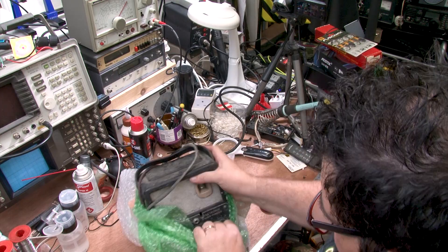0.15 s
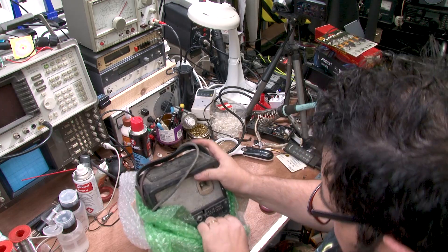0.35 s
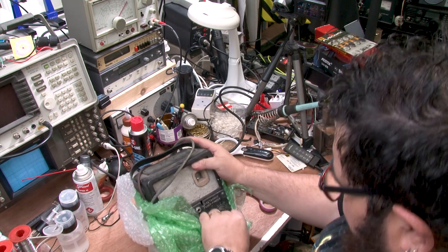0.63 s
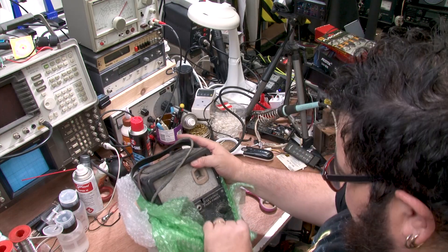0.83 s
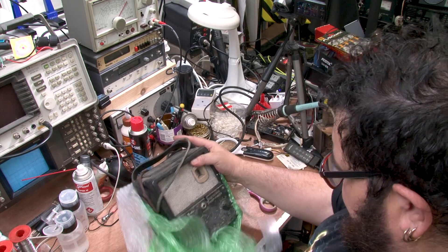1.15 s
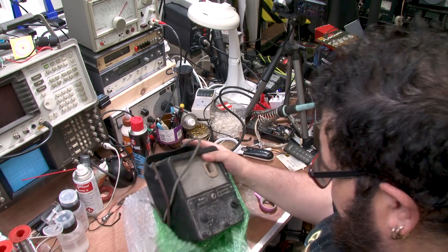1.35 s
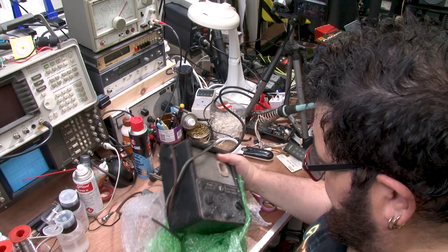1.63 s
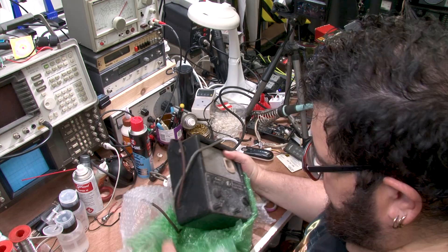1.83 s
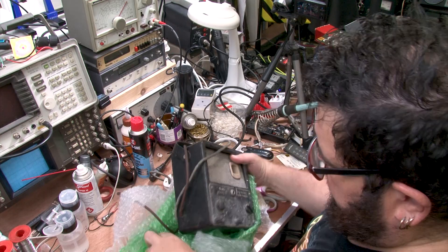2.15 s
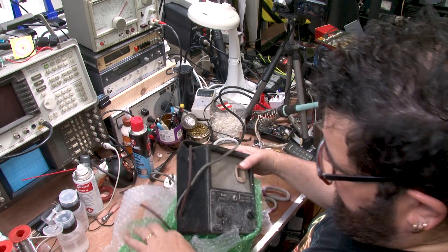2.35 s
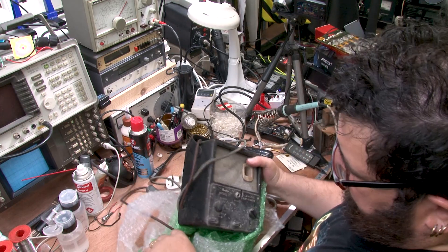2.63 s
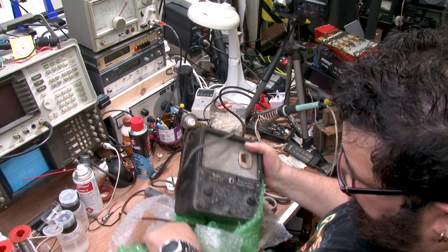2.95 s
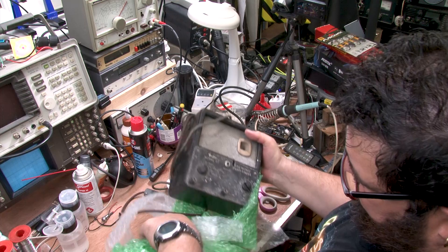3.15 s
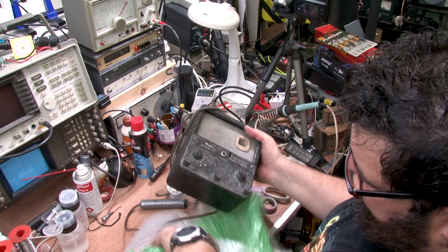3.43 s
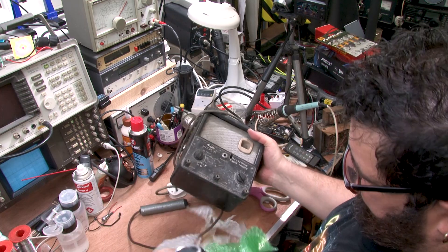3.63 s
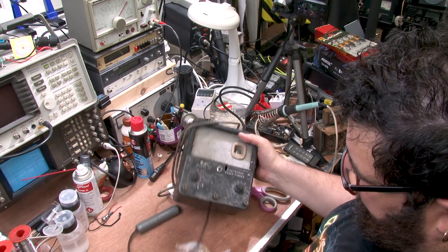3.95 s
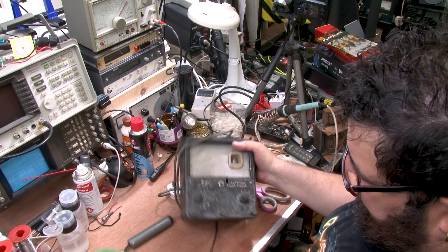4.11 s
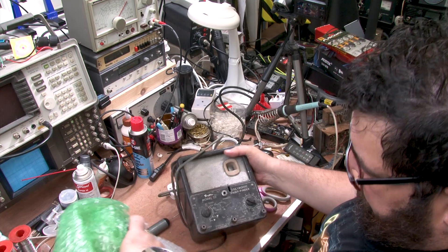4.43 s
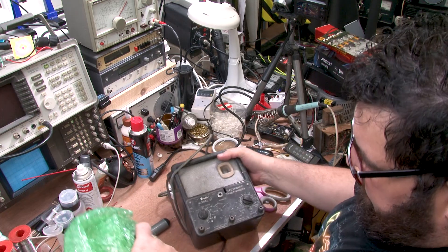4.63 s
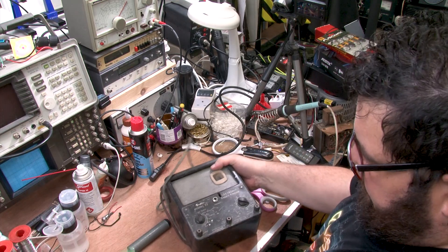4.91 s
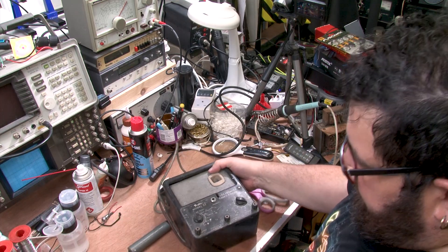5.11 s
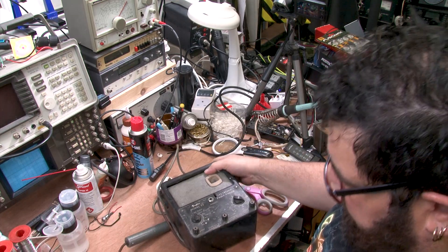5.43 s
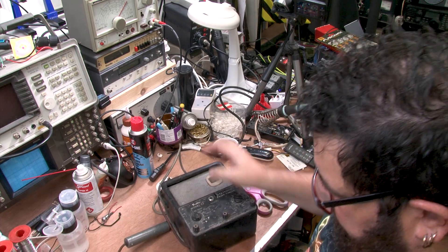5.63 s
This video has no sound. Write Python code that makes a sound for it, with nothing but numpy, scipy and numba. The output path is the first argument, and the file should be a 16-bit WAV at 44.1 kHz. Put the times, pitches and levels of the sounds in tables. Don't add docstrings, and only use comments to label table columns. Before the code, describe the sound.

Close stereo pickup of unpacking at a workbench: crisp plastic film crackles in uneven tugs, air pockets snapping loudly, while the metal box inside booms dully when bumped. A thick cluster of snaps comes early, another sharp burst midway. Faint film squeaks precede the heaviest knock on the bench; afterwards come softer bumps, a dry clink and near quiet with faint room hum.

```python
import sys
import numpy as np
from scipy import signal
from scipy.fft import rfft, irfft
from scipy.io import wavfile
from scipy.ndimage import uniform_filter1d
from numba import njit

SR = 44100
rng = np.random.default_rng(int(sys.argv[2]) if len(sys.argv) > 2 else 0)


def output_pcm(signal):
    pcm = np.clip(np.atleast_2d(signal).T, -1, 1) * 32767
    wavfile.write(sys.argv[1], SR, np.round(pcm).astype(np.int16))


def voltage_ratio(decibels):
    exponent = np.asarray(decibels, float) / 20
    return 10 ** exponent


N = 254456


def along(table, t):
    s, *columns = np.transpose(table)
    return [np.interp(t, s, c) for c in columns]


def colour_db(spectrum, hz):
    f, db = np.transpose(spectrum)
    return np.interp(np.log(np.maximum(hz, 1)), np.log(f), db)


def unit(x):
    return x / np.sqrt(np.mean(x ** 2))


def above(x, hz):
    return signal.sosfilt(signal.butter(2, hz, "high", fs=SR, output="sos"), x)


def swells(t, start, hold, db, rise, fall):
    since = t[:, None] - start
    return voltage_ratio(2 * (db + rise * np.minimum(since, 0) - fall * np.maximum(since - hold, 0)))


@njit
def ring(n, start, turn, fade, size):
    out = np.zeros(n)
    for k in range(len(start)):
        i = int(start[k]) + 1
        p = np.exp(1j * turn[k] - fade[k])
        z = size[k] * p ** (i - start[k])
        for j in range(max(i, 0), min(n, i + int(7 / fade[k]))):
            out[j] += z.imag
            z *= p
    return out


def swings(s, hz, t60, db, pan_db, lag):
    turn = 2 * np.pi * np.minimum(hz, .38 * SR) / SR
    fade = np.log(1000) / (np.maximum(t60, 1e-4) * SR)
    size = voltage_ratio(db) * (-1.) ** np.arange(len(s))
    return np.array([ring(N, s * SR + side * lag / 2, turn, fade, size * voltage_ratio(side * pan_db / 2))
                     for side in (1., -1.)])


def body(x, modes, stretch=1):
    t = np.arange(SR // 5) / SR
    response = 0
    for k, (hz, db, t60) in enumerate(modes):
        decay = 1000. ** (-t / (t60 * stretch))
        response = response + (-1) ** k * voltage_ratio(db) * np.sin(2 * np.pi * hz * t) * decay
    return signal.fftconvolve(x, response)[:len(t) if len(x) < SR else N]


def chatter(table, spread):
    out = 0
    for s, length, hz, db, ring_s in table:
        when, size, tune = rng.random((30, 3)).T
        taps = swings(s + length * when ** 1.2, hz * (1 + spread * (tune - .5)), ring_s + 0 * when,
                      -8 * size, -2.5 + 0 * when, 1.5 + 0 * when)
        out = out + voltage_ratio(db) * taps / np.std(taps[:, int(s * SR):int((s + length) * SR)])
    return out


# [f/Hz, density/dB]
SHOP_SPECTRUM = [(33, -15), (52, -1), (153, -5.5), (189, -17), (437, -13), (1040, -19.5), (6380, -18),
                 (13700, -30), (16000, -44)]
SHOP_DB = -46.5


def shop():
    hz = np.fft.rfftfreq(N, 1 / SR)
    mid, side = rfft(rng.standard_normal((2, N))) * voltage_ratio(colour_db(SHOP_SPECTRUM, hz))
    side = side * np.minimum(hz / 250, 1)
    return unit(irfft(np.array([mid + side, mid - side]), N)) * voltage_ratio(SHOP_DB)


# [f/Hz, density/dB]
FILM_SPECTRUM = [(290, -48), (500, 8), (933, -7.5), (1140, 2.5), (2540, 1.5), (3060, 0), (3650, 3),
                 (6330, 3), (12500, -2), (15100, -10), (16000, -24)]
# [t/s, resting rustle/dB, left minus right/dB, large folds/dB]
HAND = [(0.0, -34.5, -3.5, -5.5), (0.25, -31.5, -4, -10), (0.65, -31, -1.5, -7.5), (0.9, -26.5, -1, -12.5),
        (1.4, -26, -0.5, -7), (1.7, -25.5, -1.5, -7.5), (2.05, -28.5, -2.5, -6), (2.38, -28.5, -2, -6.5),
        (2.75, -30.5, -2, -2), (3.07, -32, -2.5, -10.5), (3.4, -29, -1.5, -10.5), (3.7, -32.5, -2, -8.5),
        (4.02, -29, -3.5, -13), (4.35, -37.5, -4, -5.5), (4.68, -46.5, -7, -2), (5.15, -38.5, -2, -8),
        (5.6, -54, -5.5, -5), (5.77, -55, -3, -10)]
# [start/s, hold/s, level/dB, fine creases/dB]
TUGS = [(0.0, .02, -25.5, -17.5), (0.132, 0.078, -26.5, -12.5), (0.34, 0.22, -27.5, -16.5),
        (0.753, 0.095, -21, -11), (0.845, .03, -26.5, -13), (0.999, 0.043, -21, -4), (1.045, .01, -23, -15),
        (1.215, 0.034, -23, -31), (1.326, .04, -30, -16), (1.12, 0.1, -20.5, -3), (1.25, 0.041, -24, -23),
        (1.377, 0.022, -21.5, -19), (1.55, 0.091, -23, -16), (1.804, 0.09, -27.5, -13),
        (2.163, 0.031, -27.5, -15), (2.373, 0.13, -27, -11), (2.565, 0.22, -28.5, -20.5),
        (2.943, 0.0048, -25, -0.5), (3.0, 0.016, -44, -25), (3.145, 0.21, -27.5, -11.5),
        (3.37, 0.014, -19.5, -11), (3.527, 0.052, -23.5, -12), (3.898, 0.054, -32, -4),
        (4.136, 0.021, -29.5, -9.5), (4.433, .03, -35.5, -12), (4.5, 0.013, -33.5, -14),
        (4.746, 0.0089, -47.5, -4), (4.868, 0.037, -37.5, -10), (4.972, 0.045, -29, -8),
        (5.061, 0.15, -28, -15), (5.306, 0.014, -31, -12), (5.43, 0.018, -40.5, -4),
        (5.739, 0.091, -30.5, -13)]
TUG_RISE_DB_S, TUG_FALL_DB_S, REST_FINE_DB = 276, 159, -13
AFTER_DB, AFTER_FALL_DB_S = -14, 350
CREASES_PER_S = 4000


def crinkle():
    count = int(CREASES_PER_S * N / SR)
    when, strength, place = rng.random((count, 3)).T
    patch, cycles, late = rng.random((count, 4, 3)).T
    s = when * N / SR
    rest_db, pan_db, fold_db = along(HAND, s)
    start, hold, tug_db, tug_fine_db = np.transpose(TUGS)
    tugs = swells(s, start, hold, tug_db, TUG_RISE_DB_S, TUG_FALL_DB_S)
    buckle_s, buckle_db = np.transpose([row[:2] for row in SNAPS + TICKS])
    after = swells(s, buckle_s + .002, 0, buckle_db + AFTER_DB, 1e5, AFTER_FALL_DB_S)
    rest = voltage_ratio(2 * rest_db) + after.sum(axis=1)
    power = rest + tugs.sum(axis=1)
    level_db = 10 * np.log10(power)
    fine_db = (rest * REST_FINE_DB + tugs @ tug_fine_db) / power
    hz = 450 * (16000 / 450) ** patch
    tilt_db = np.where(hz < 2500, fold_db + 8.5, np.where(hz > 8000, fine_db + 8.0, 0))
    db = level_db + tilt_db + colour_db(FILM_SPECTRUM, hz) + 20 * np.log10(hz / 4000)
    db = db - 1.5 * np.log(strength + 0.17) - 4.0
    t60 = (4.5 + 5 * cycles) / hz
    lag = 18 + 60 * (place - .5)
    return swings((s + 0.001143 * late).ravel(), hz.ravel(), t60.ravel(), db.ravel(),
                  np.tile(pan_db + 5 * (place - .5), 4), np.tile(lag, 4))


# [start/s, hold/s, case/dB, bench/dB]
SHOVES = [(0.0, 0.01, -40, -29), (0.14, 0.017, -36.5, -52), (0.53, 0.052, -39.5, -48),
          (1.116, 0.045, -42, -31.5), (1.277, 0.054, -33.5, -24), (1.456, 0.2, -36, -35),
          (1.854, 0.046, -48, -29), (2.15, 0.16, -38.5, -56), (2.605, 0.16, -38.5, -29),
          (2.955, 0.032, -42, -34), (3.21, 0.13, -42, -40), (3.42, .03, -33.5, -26),
          (3.502, 0.034, -34, -23), (3.805, 0.054, -45, -50), (3.96, 0.018, -41, -19.5),
          (4.14, 0.032, -37, -44), (4.397, 0.017, -39, -18), (4.73, 0.11, -51, -60),
          (5.03, 0.068, -38, -31), (5.192, 0.14, -42.5, -23)]
SHOVE_RISE_DB_S, SHOVE_FALL_DB_S = 68, 82
# [f/Hz, level/dB, ring/s]
CASE = [(151, -12.5, 0.12), (214, 0, 0.049), (245, 3, 0.049), (300, 6.5, 0.03), (339, 1, 0.083),
        (385, -3.5, 0.13), (450, 10, 0.019), (463, 4.5, 0.022), (618, -0.5, 0.052), (692, -11.5, 0.15),
        (774, -6, 0.16), (840, -7.5, 0.024), (1140, -12, 0.12)]
# [f/Hz, level/dB, ring/s]
BENCH = [(85.8, -2, 0.33), (118, 0.5, 0.072), (57, 3.5, 0.28), (150, -7, 0.1)]
# [f/Hz, level/dB, ring/s]
CUSHION = [(160, -4.5, 0.11), (207, -3.5, 0.055), (270, 2, 0.045), (320, 3.5, 0.043)]


def drag():
    t, coarse = np.arange(N) / SR, np.arange(0, N / SR, .002)
    start, hold, *levels = np.transpose(SHOVES)
    gains = []
    for db in levels:
        power = swells(coarse, start, hold, db, SHOVE_RISE_DB_S, SHOVE_FALL_DB_S).sum(axis=1)
        gains.append(np.interp(t, coarse, np.sqrt(power)))
    case_gain, bench_gain = gains
    slips = (rng.random(N) < .03) * rng.standard_normal(N) * rng.exponential(1, N)
    case = unit(above(body(slips, CASE, 0.72), 124)) * case_gain * voltage_ratio(0.5)
    case = case + unit(body(slips[::-1], CUSHION)) * case_gain * voltage_ratio(-8.0)
    bench = unit(body(rng.standard_normal(N), BENCH, 0.35)) * bench_gain * voltage_ratio(-19.5)
    return np.array([voltage_ratio(-5.5) * np.roll(case, 20), voltage_ratio(1.0) * case]), bench


# [t/s, peak/dB, f/Hz, flap/dB, flap f/Hz]
SNAPS = [(0.2085, -21.5, 6510, -22, 2040), (0.3605, -28, 3930, -4, 720), (0.412, -17, 4150, -25, 1930),
         (0.7176, -12.5, 3180, -12, 2000), (0.7551, -23, 6260, -7, 899), (0.893, -7.5, 6800, -10, 1340),
         (0.97, -13, 3500, -21, 1780), (0.984, -6, 4630, -18, 1200), (1.0059, -4.5, 6200, -16, 1050),
         (1.0902, -17, 4440, -8, 1670), (1.114, -11, 5120, -17, 1520), (1.1532, -14.5, 4470, -11, 1090),
         (1.2124, -13.5, 5400, -13.5, 1540), (1.3018, -6.5, 2980, -13, 1770),
         (1.424, -15.5, 3240, -9.5, 1720), (1.715, -22.5, 2670, -7, 1820),
         (2.4131, -16.5, 4020, -9.5, 1940), (2.7392, -31, 3270, -2, 1330), (3.48, -3, 3000, -15.5, 890),
         (4.0894, -27, 7000, -8, 1890), (4.2099, -21.5, 1970, -9, 1300), (4.514, -31, 3220, 2, 1830),
         (4.5495, -25.5, 3930, -6.5, 2110), (5.069, -24.5, 2760, -7, 1140)]
# [t/s, peak/dB, f/Hz, left minus right/dB]
TICKS = [(0.5205, -20, 4230, -10), (0.7997, -18, 3360, 4), (0.83, -20, 3200, -2), (0.876, -14, 6340, -10),
         (0.9034, -24, 6240, -4), (0.912, -11, 7030, 4), (0.9265, -8, 4670, -3), (0.9417, -10.5, 4030, 1),
         (0.9603, -7.5, 4760, -2), (0.975, -3.5, 4550, 2), (1.124, -30, 2960, 2), (1.1813, -7.5, 6660, -2),
         (1.437, -13.5, 3170, 1), (1.5448, -14, 4870, -4), (1.587, -16, 6240, 0), (1.8153, -18, 2950, -2),
         (2.173, -26, 4290, 7), (2.4749, -14, 6380, -7), (2.876, -15, 5830, -1), (2.9436, -15, 4680, 0),
         (2.9476, -13, 5000, -12), (3.016, -16.5, 6600, -4), (3.1365, -24, 2750, -1),
         (3.3558, -19, 6700, -4), (3.4797, -7, 10500, -4), (3.4823, -7, 6300, -3), (3.528, -12, 6500, 3),
         (3.5308, -12, 6500, 4), (3.5352, -17, 6400, 0), (3.568, -13.5, 3960, -1), (4.154, -17, 7000, 3),
         (4.4365, -28, 5100, -13), (4.619, -25, 11000, -8), (5.155, -29, 6050, -9)]
# [t/s, peak/dB, f/Hz, left minus right/dB]
FLICKS = [(0.0126, -25, 5170, -8), (0.0701, -29, 4820, -8), (0.3533, -36, 3880, -5), (0.596, -24, 5000, -5),
          (0.6083, -22, 5000, -6), (0.6887, -26, 4570, 3), (0.738, -13.5, 5230, 6),
          (0.8208, -8.5, 6370, -3), (0.8372, -10, 6200, 4), (1.101, -9, 6980, -1), (1.1567, -8, 7320, 2),
          (1.5748, -15.5, 4300, 4), (2.06, -21, 6460, -5), (4.166, -21.5, 5680, -10),
          (4.2003, -20, 6890, -2), (4.302, -23, 6800, -4), (4.5072, -25, 9910, -7), (4.624, -32, 12490, -7),
          (4.84, -32, 4740, -6), (5.5479, -39, 4310, 4), (5.5949, -40, 9800, -16)]
TICK_FLAP_DB, TICK_FLAP_SHARE = -55, 0.15


def snaps():
    rows = [tuple(row) + tuple(along(HAND, row[0])[1:2]) for row in SNAPS]
    rows += [(s, db, hz, TICK_FLAP_DB, hz * TICK_FLAP_SHARE, pan) for s, db, hz, pan in TICKS + FLICKS]
    s, peak_db, hz, low_db, low_hz, pan_db = np.transpose(rows)
    patch, late = rng.random((len(s), 24, 2)).T
    patch = (np.arange(24)[:, None] + patch) / 24
    s = s + 0.00071
    spray_hz = 1500 * 10 ** patch
    spray_db = peak_db + colour_db(FILM_SPECTRUM, spray_hz) + 19 * np.log10(spray_hz / 4000) - 8.0
    spray = swings((s + 0.00105 * late ** 1.366).ravel(), spray_hz.ravel(), 6 / spray_hz.ravel(),
                   spray_db.ravel(), np.tile(pan_db, 24), 12 + 22 * (late.ravel() - .5))
    lag = 5 + 0 * s
    own = swings(s + 0.000473, hz, 16 / hz, peak_db + 1.5, pan_db, lag / 3)
    flap = sum(swings(s + 0.00074, low_hz * ratio, 5 / low_hz, peak_db + low_db + db, pan_db, lag)
               for ratio, db in ((0.94, 17.5), (1.65, -31), (1.99, -35)))
    return spray + own + flap


# [t/s, peak/dB, f/Hz]
THUMPS = [(0.11, -26, 200), (0.161, -29, 240), (0.356, -18, 204), (0.557, -27, 269), (0.713, -21, 269),
          (0.744, -23, 269), (0.887, -24, 203), (1.092, -28, 157), (1.147, -24, 270), (1.293, -43, 269),
          (1.667, -38, 151), (2.198, -36, 172), (2.262, -40, 264), (2.76, -31, 272), (3.216, -33, 151),
          (3.341, -30, 237), (3.478, -34, 140), (3.615, -24, 245), (3.742, -34, 234), (3.82, -34, 153),
          (3.952, -27.5, 161), (4.149, -23, 151), (4.21, -16, 137), (4.248, -15.5, 146), (4.385, -28, 134),
          (5.064, -32, 269), (5.182, -30, 201), (5.297, -42, 121), (5.526, -38, 151)]
THUMP_CYCLES, THUMP_DB = 18, 0.5


def thumps():
    s, db, hz = np.transpose(THUMPS)
    blows = swings(s + 0.0047, hz, THUMP_CYCLES / hz, db + THUMP_DB, -2.5 + 0 * s, 6 + 0 * s)
    return above(above(uniform_filter1d(blows, size=40, axis=1), 123), 123)


# [t/s, case peak/dB, bench peak/dB, struck panel f/Hz]
BUMPS = [(0.162, -22, -42, 330), (0.359, -8, -44, 328.6), (0.512, -25, -51, 296), (0.562, -19.5, -47, 280),
         (0.715, -11.5, -44, 367), (0.745, -12.5, -50, 347), (0.89, -17, -51, 360),
         (1.003, -25.5, -53, 463), (1.153, -16.5, -54, 356), (1.416, -29, -53, 350),
         (2.765, -11.5, -56, 332), (2.881, -20, -57, 450), (2.946, -27, -53, 400), (3.368, -21.5, -28, 450),
         (3.48, -40, -19, 385), (3.615, -23, -33.5, 385), (4.145, -23, -42, 260), (4.21, -1.5, -9, 451),
         (4.254, -49, -14, 350), (4.287, -23, -25, 415), (4.575, -27.5, -67, 395), (4.738, -23.5, -57, 380),
         (5.186, -25, -31, 385), (5.301, -19, -17, 356), (5.39, -32, -29, 339), (4.369, -40, -55, 367),
         (4.618, -34, -60, 385), (4.696, -33, -60, 428), (4.858, -34, -60, 396), (4.962, -29, -50, 360),
         (5.0, -36, -55, 374), (5.048, -32, -55, 303), (5.206, -23, -30, 385), (5.325, -42, -39, 360),
         (5.353, -27, -38, 338), (5.437, -49, -45, 410), (5.487, -43, -40, 345)]
# [f/Hz, level/dB, ring/s]
KNOCK = [(295.4, 3.5, 0.022), (605, 0, 0.014)]
HELD_RING = 0.88
DEEP_DB, DEEP_PER_BENCH_DB = 21, 2.5


def bumps():
    cases, benches = np.zeros((2, 2, N + SR))
    push = np.hanning(30)
    for s, case_db, bench_db, panel_hz in BUMPS:
        spot_db = 1.5 * rng.standard_normal(len(CASE))
        deep_db = DEEP_DB + DEEP_PER_BENCH_DB * bench_db
        modes = [(f, db + u + deep_db * (f < 270), t) for (f, db, t), u in zip(CASE, spot_db)]
        modes.append((panel_hz, 5.5, .06))
        blow = sum(body(push, [mode]) for mode in KNOCK)
        case = above(body(push, modes, HELD_RING) - blow, 130)
        bench = body(np.hanning(130), BENCH)
        case = case * voltage_ratio(case_db) / np.abs(case).max()
        bench = bench * voltage_ratio(bench_db - 1.0) / np.abs(bench).max()
        i = int((s + 0.00157) * SR)
        cases[0, i + 20:i + 20 + len(case)] += voltage_ratio(-1.0) * case
        cases[1, i:i + len(case)] += voltage_ratio(1.5) * case
        benches[:, i - 150:i - 150 + len(case)] += bench
    return cases[:, :N], benches[:, :N]


# [t/s, length/s, f/Hz, level/dB, ring/s]
RUBS = [
    (.315, .03, 302, -43.5, 0.057),
    (.5, .03, 320, -42, .05),
    (.775, .03, 340, -38.5, .05),
    (.375, 0.058, 321, -32, 0.19),
    (.54, 0.058, 300, -36.5, 0.12),
    (.565, 0.034, 386, -35, 0.071),
    (1.42, .11, 336, -37, 0.13),
    (2.1, 0.034, 379, -38.5, 0.068),
    (2.25, 0.056, 415, -35.5, 0.11),
    (2.78, 0.029, 340, -33.5, 0.11),
]


def rubs():
    return chatter(RUBS, 0.03)


# [t/s, length/s, f/Hz, level/dB, ring/s]
TINKLES = [
    (1.007, .006, 6190, -26, .1),
    (1.3025, .004, 3060, -24, .055),
    (4.0, .05, 6600, -46, .05),
    (5.156, .002, 6090, -21, .012),
]


def tinkles():
    return chatter(TINKLES, .0015)


# [start/s, length/s, f/Hz, level/dB]
SQUEAKS = [
    (3.775, 0.069, 3100, -38),
    (3.88, 0.28, 3080, -45),
    (4.0, 0.2, 6970, -39.5),
]


def squeaks():
    t, out = np.arange(N) / SR, 0
    for s, length, hz, db in SQUEAKS:
        waver = uniform_filter1d(uniform_filter1d(rng.standard_normal((2, N)), size=400), size=400)
        waver = waver / waver.std()
        shape = np.sqrt(np.sin(np.pi * np.clip((t - s) / length, 0, 1)) + 1e-12)
        tone = np.sin(2 * np.pi * np.cumsum(hz * (1 + 0.0061 * waver[1])) / SR)
        out = out + voltage_ratio(db + 4.8 * waver[0]) * shape * tone
    return out * voltage_ratio(np.array([[-1.2], [1.2]]))


ROOM_T60_S, ROOM_DB = .17, -8


def room(x):
    t = np.arange(SR // 3) / SR
    decay = 1000. ** (-t / ROOM_T60_S) + 2.56 * np.exp(-t / 0.0014)
    echoes = rng.standard_normal((2, len(t))) * decay * (t > .0015)
    echoes = signal.lfilter([1], [1, -.3], echoes)
    echoes = echoes / np.sqrt(np.sum(echoes ** 2, axis=1, keepdims=True))
    return x + voltage_ratio(ROOM_DB) * signal.fftconvolve(x, echoes, axes=1)[:, :N]


def scene():
    case_rub, bench_rub = drag()
    case_hits, bench_hits = bumps()
    film = above(above(crinkle() + snaps() + tinkles() + squeaks(), 170), 356)
    bench = above(above(bench_hits + bench_rub, 56), 49)
    bench = bench * voltage_ratio(np.array([[-1.1], [1.1]])) + room(bench) - bench
    case = case_hits + thumps() + case_rub + rubs()
    case = case + voltage_ratio(-2.0) * (room(case) - case)
    return shop() + room(film) + case + voltage_ratio(3.5) * bench


def top_cut(x):
    return signal.sosfilt(signal.butter(12, 16460, fs=SR, output="sos"), x)


def record(dry):
    top = signal.ellip(8, .2, 70, 15700, fs=SR, output="sos")
    clipped = np.clip(dry, -.87, .87)
    return top_cut(signal.sosfilt(top, clipped))


dry = scene()
out = record(dry)
output_pcm(out)
```